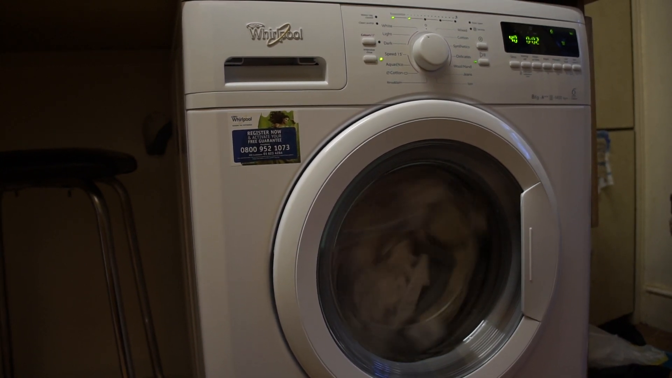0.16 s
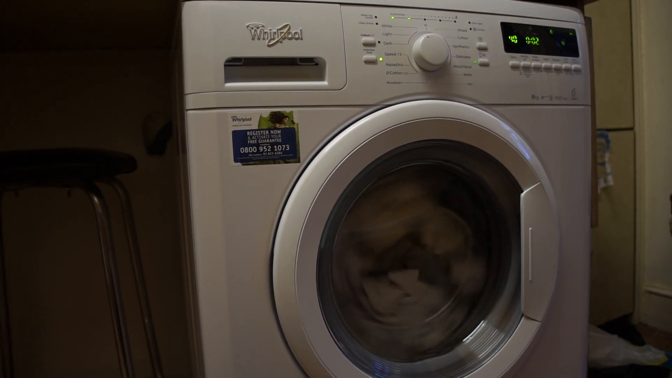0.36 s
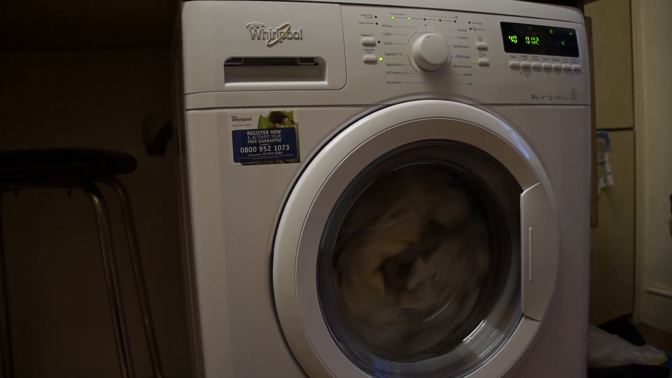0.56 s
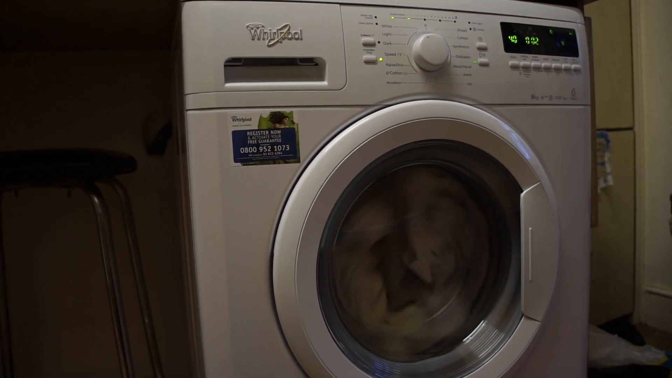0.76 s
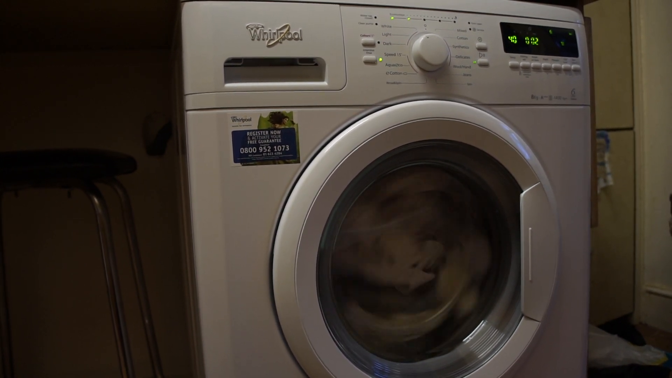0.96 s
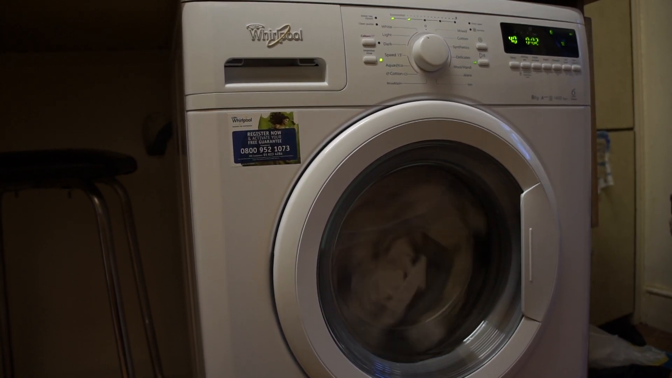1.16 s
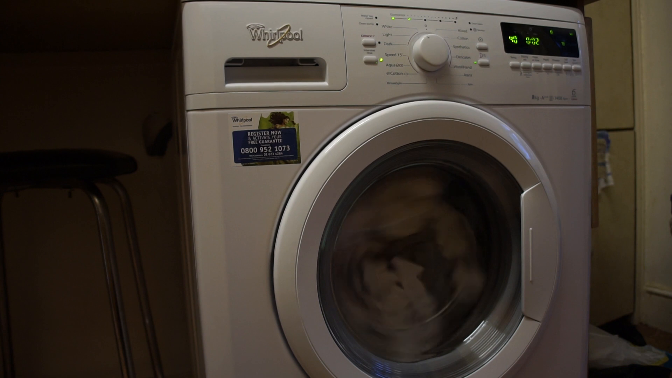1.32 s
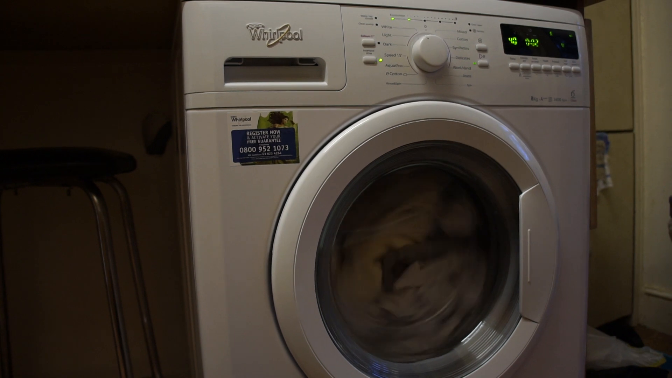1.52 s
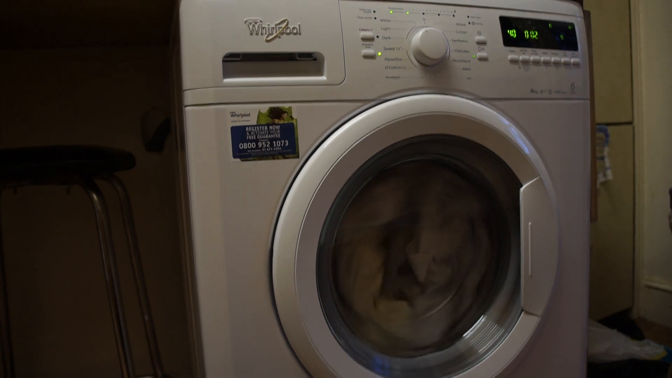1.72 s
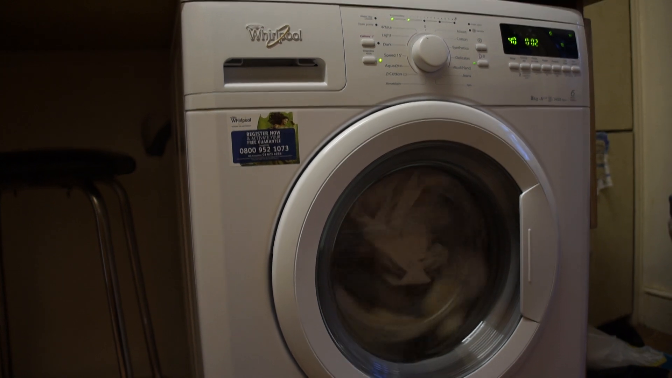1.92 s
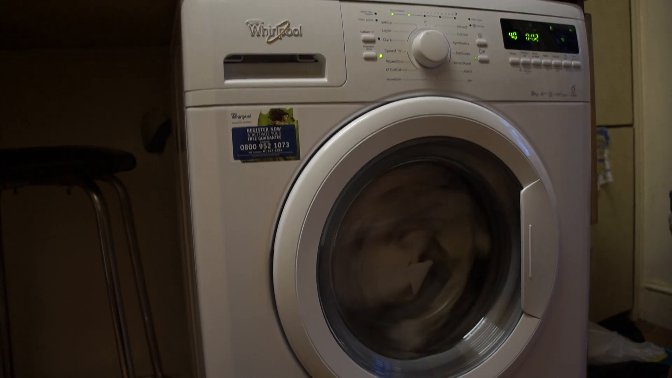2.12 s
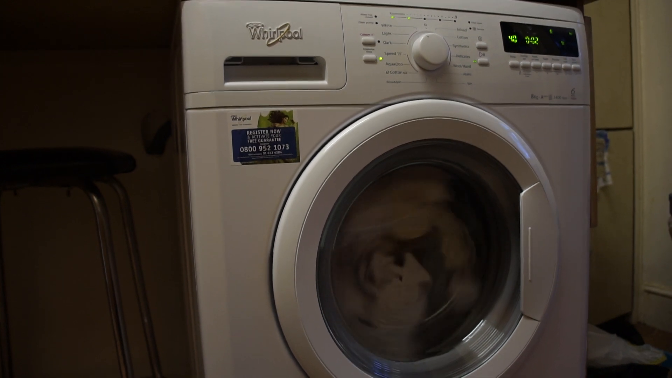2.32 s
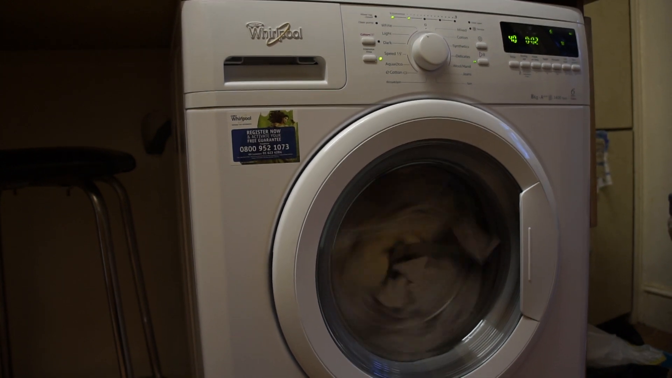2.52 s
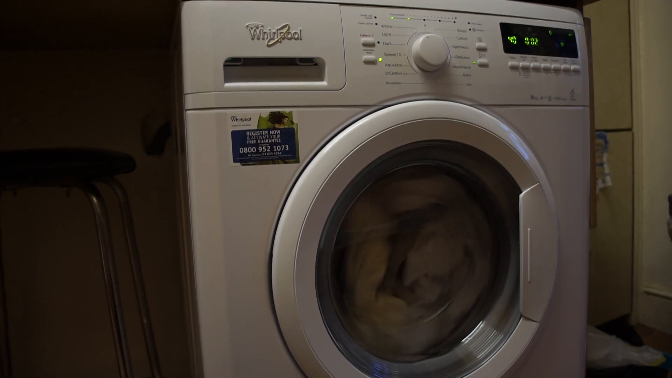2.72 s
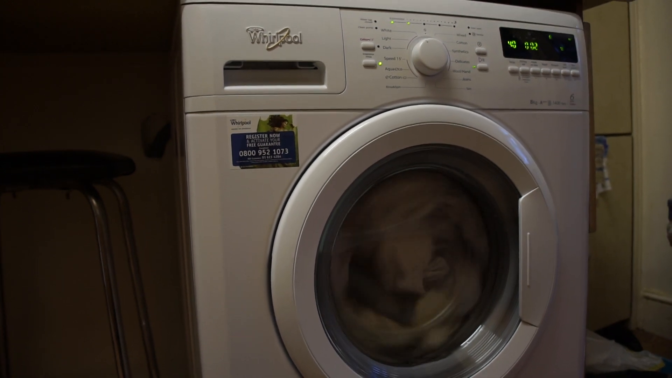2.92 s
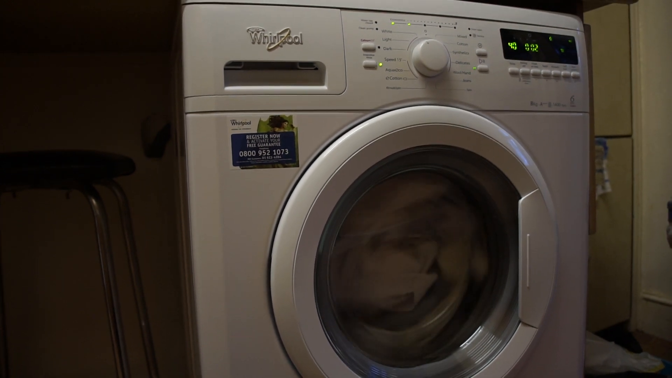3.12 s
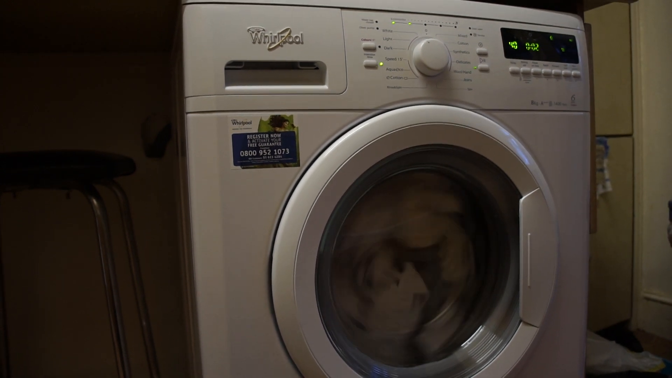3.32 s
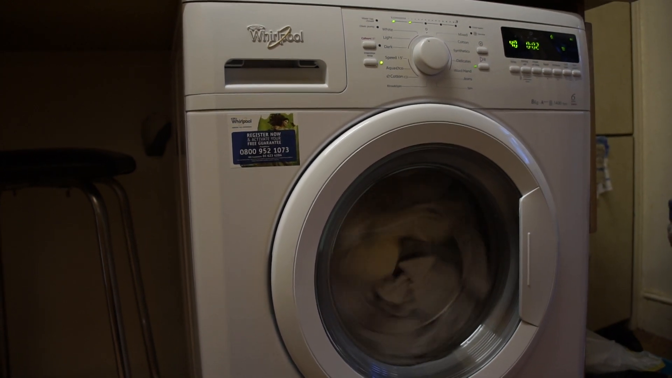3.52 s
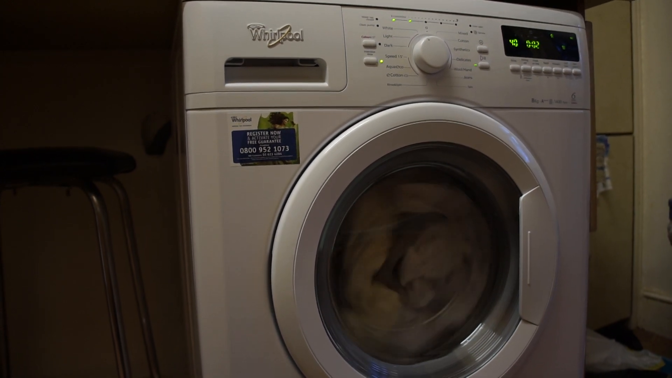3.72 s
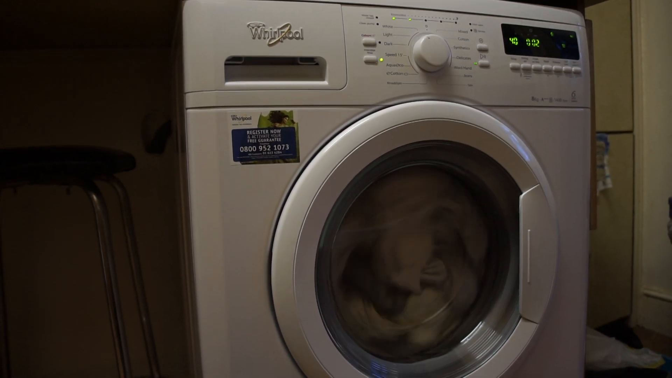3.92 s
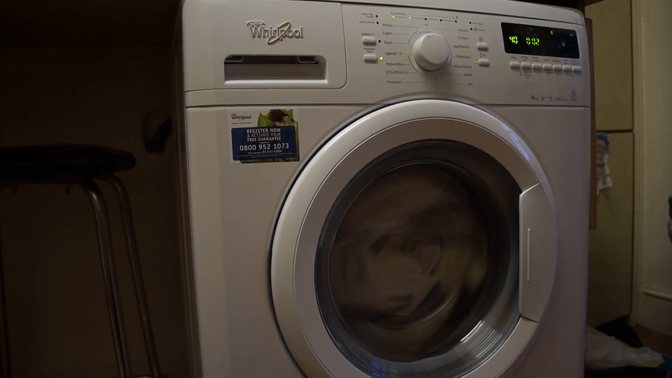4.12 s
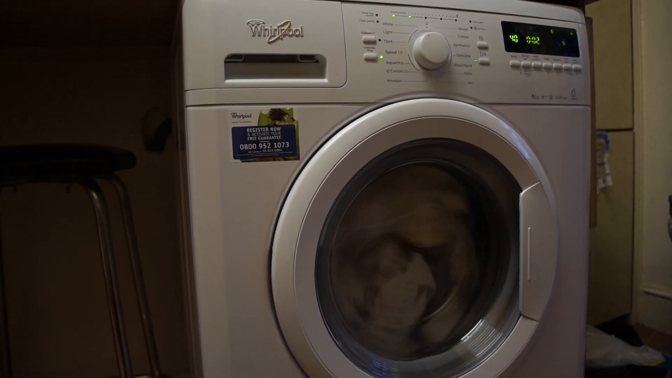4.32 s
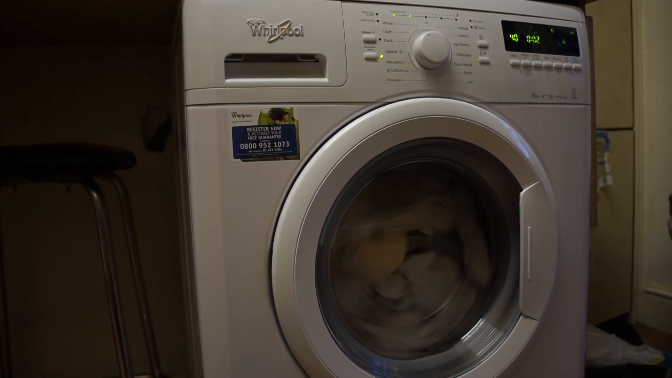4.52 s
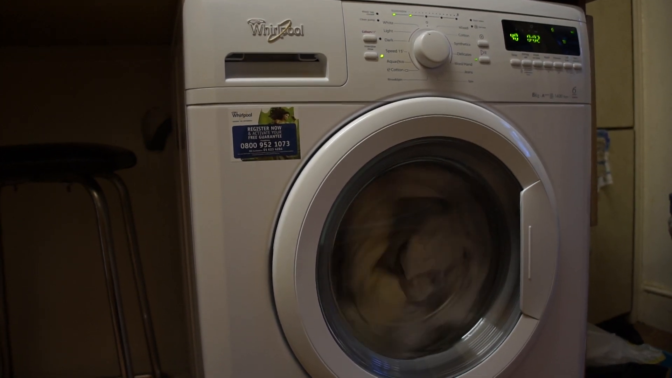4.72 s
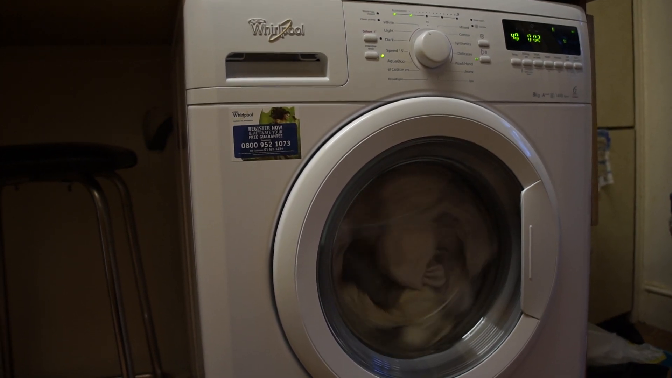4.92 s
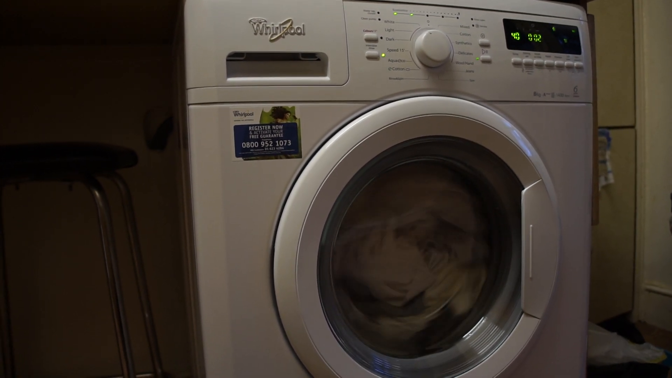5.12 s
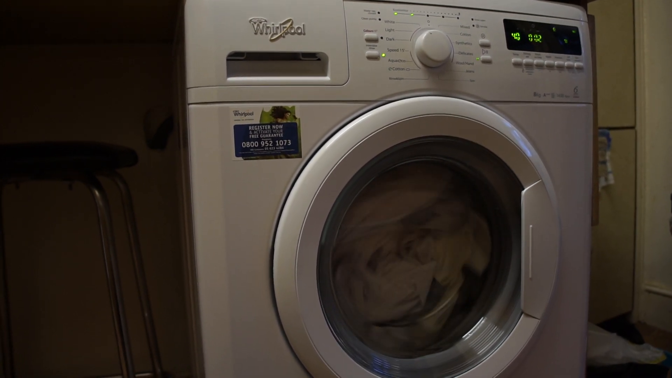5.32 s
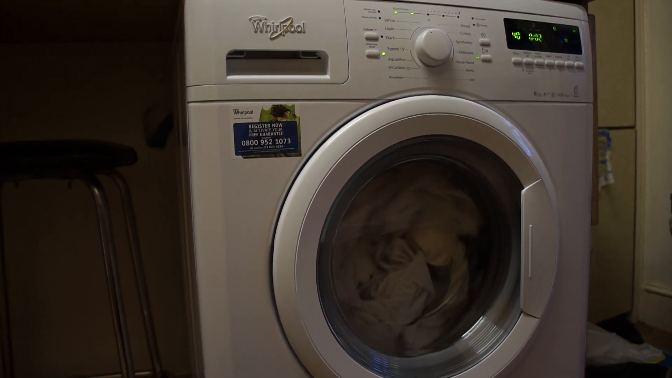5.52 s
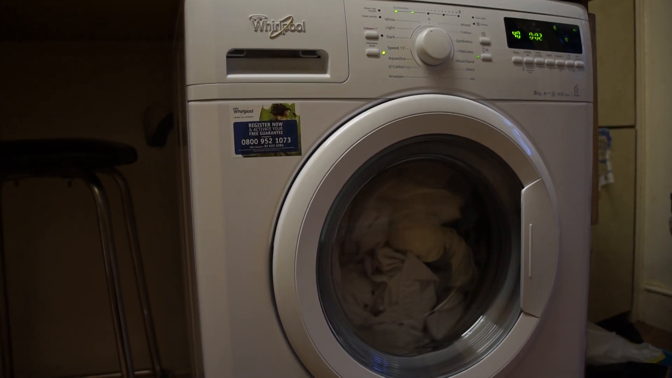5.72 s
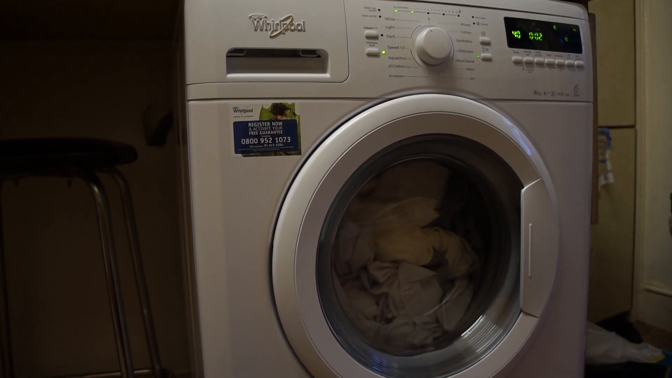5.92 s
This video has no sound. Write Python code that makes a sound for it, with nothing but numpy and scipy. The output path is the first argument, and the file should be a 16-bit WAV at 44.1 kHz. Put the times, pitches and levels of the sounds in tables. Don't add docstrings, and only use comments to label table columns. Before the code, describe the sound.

A strong mid-pitched motor whine wobbles as the load drags it, sagging briefly each turn while thin, rough high panel tones swell and fade. Soft ragged wet slaps and low thuds fall around the drum, with tiny hard ticks and steady hiss. The motor suddenly stops; faint whine, loose drum rumble and thinning hiss remain, then a latch clacks. Close stereo pickup, short indoor reverberation.

```python
import sys
import numpy as np
from scipy import signal
from scipy.fft import rfft, irfft, next_fast_len
from scipy.io import wavfile
from scipy.ndimage import uniform_filter1d, map_coordinates

SR = 44100
rng = np.random.default_rng(int(sys.argv[2]) if len(sys.argv) > 2 else 0)


def materialize(psi):
    bounded = np.clip(np.atleast_2d(psi).T, -1, 1)
    quanta = np.round(bounded * 32767).astype(np.int16)
    wavfile.write(sys.argv[1], SR, quanta)


def rack_gain(trim_db):
    fader = np.asarray(trim_db, float)
    return 10 ** (fader / 20)


N = 266937
T = np.arange(N) / SR
MAINS_HZ = 49.98
CUT_S = 4.69


def unit(x):
    return x / np.sqrt(np.mean(x ** 2) + 1e-20)


def along(points, hz):
    f, v = np.transpose(points)
    return np.interp(np.log(hz + 1), np.log(f + 1), v)


def curves(rows):
    s, *columns = np.transpose(rows)
    return [np.interp(T, s, column) for column in columns]


def wobble(rate):
    knots = rng.standard_normal(int(N * rate / SR) + 4)
    return map_coordinates(knots, [T * rate])


def bumps(rows, rest_db):
    swell_power = sum(rack_gain(2 * db) * np.exp(-((T - s) / half) ** 2) for s, half, db in rows)
    return 10 * np.log10(rack_gain(2 * rest_db) + swell_power)


def filtered(x, response):
    m = next_fast_len(N + SR // 2)
    return irfft(rfft(x, m) * response(np.fft.rfftfreq(m, 1 / SR)), m)[..., :N]


# (frequency [Hz], likeness [-1 to 1])
ALIKE = [(25, .99), (60, .96), (125, .97), (300, .9), (600, .95), (1200, .6), (2200, .5), (3500, .1)]


def rush(gain, alike=ALIKE):
    def mid_side(hz):
        turn = np.arccos(np.clip(along(alike, hz), -1, 1)) / 2
        return gain(hz) * np.array([np.cos(turn), np.sin(turn)])
    mid, side = filtered(rng.standard_normal((2, N)), mid_side)
    return unit(np.array([mid + side, mid - side]))


def tone(phase, db, lead, pan_db):
    side = np.array([[.5], [-.5]])
    return np.sqrt(2) * rack_gain(db + pan_db * side) * np.sin(phase + lead * side)


def onset(s, rise):
    return 1 - np.exp(-(np.clip(T - s, 0, None) / rise) ** 2)


def driven(t60):
    return rack_gain(-60 * np.clip(T - CUT_S, 0, None) / t60)


# (time [s], whine pitch [Hz], whine level [dB])
WHINE_PATH = [(0, 631, -30.5), (.25, 634, -33.5), (.52, 626.4, -38.5), (.85, 624.2, -31.5),
              (1.2, 638, -31.5), (1.4, 633.5, -32.5), (1.58, 625.4, -37), (1.74, 622, -32.5),
              (2.02, 623.5, -33), (2.32, 625.7, -40), (2.58, 622.2, -33.5), (3.28, 621.3, -31.5),
              (3.5, 629, -38), (3.68, 626, -39.5), (3.8, 624.4, -34), (4.1, 625.5, -34), (4.24, 627.8, -38),
              (4.48, 628.8, -34.5)]
# (time [s], depth [Hz])
LIFTS = [
    (.86, 3.95),
    (1.86, 6.5),
    (2.89, 13),
    (3.93, 11),
]
COAST_HZ, COAST_FROM_DB = 623.5, -34.5


def speed():
    inertia_s, lift_half_s, stall_hz, stall_db_per_hz = 0.063, .1, 620, 1.5
    whine_hz, whine_db = curves(WHINE_PATH + [(CUT_S - .07, COAST_HZ, COAST_FROM_DB)])
    whine_hz = uniform_filter1d(whine_hz, round(inertia_s * SR), mode="nearest")
    for s, depth_hz in LIFTS:
        whine_hz = whine_hz - depth_hz * np.exp(-((T - s) / lift_half_s) ** 2)
    return whine_hz, whine_db - stall_db_per_hz * np.clip(stall_hz - whine_hz, 0, None)


# (multiple of the mains [x], rms level [dB])
HUM_LINES = [(2, -65.5), (3, -71), (4, -47.5), (5, -61.5), (6, -52.5), (7, -53), (8, -49), (9, -63),
             (10, -60), (11, -53.5), (12, -59), (14, -86), (15, -60), (17, -66.5), (18, -88), (21, -80),
             (23, -69), (27, -67.5), (30, -83), (34, -70), (36, -76), (46, -76)]
# (offset from the whine [mains multiples], rms level [dB], gain towards a resonance [dB/Hz])
SIDEBANDS = [(-10, -78, 0), (-8, -74.5, 1.5), (-6, -55.5, 0.88), (-5, -56, -0.3), (-4, -51.5, -0.02),
             (-3, -81, -1.5), (-2, -55, 0.32), (-1, -53, 0.5), (1, -55, -0.2), (2, -67.5, 1), (3, -63.5, 0),
             (4, -62.5, 0), (6, -72, 0.5), (8, -76, 0.5), (17, -63, 0.5), (21, -68, 0.5), (25, -55, 0),
             (29, -59.5, 0.5), (31, -64, -0.5)]
# (time [s], level [dB])
SURGES = [(0, -37.5), (.28, -33.5), (.6, -31.5), (.8, -34), (1.1, -36), (1.3, -37), (1.572, -34.5),
          (1.9, -39), (2.5, -38.5), (2.72, -38), (3.099, -36.5), (3.3, -39.5), (3.5, -36.5), (3.76, -35),
          (4.2, -36.5), (4.38, -37.5)]


def hum():
    surge_half_s, surge_rest_db, coast_drop_db, dying_t60 = 0.072, -45, -22, 0.26
    whine_hz, whine_db = speed()
    surge_db = bumps([(s, surge_half_s, db) for s, db in SURGES], surge_rest_db)
    mains = 2 * np.pi * MAINS_HZ * T
    whine = 2 * np.pi * np.cumsum(whine_hz) / SR + .1 * wobble(30)
    stray_hz = whine_hz - whine_hz.mean()

    lines = np.zeros((2, N))
    for k, db in HUM_LINES:
        phase = k * mains + rng.uniform(0, 2 * np.pi)
        lines += tone(phase, db + 1.04 * wobble(6.28), -.25 + 0.47 * wobble(0.65), 0.36)
    for k, db, slope in SIDEBANDS:
        phase = whine + k * mains + rng.uniform(0, 2 * np.pi)
        level_db = db + slope * stray_hz + 2.0 * wobble(3.98)
        lines += tone(phase, level_db, -.25 + 0.71 * wobble(0.78), 1.0)

    main = tone(whine, whine_db + 0.46 * wobble(9) + 1.74 * wobble(24.86), -0.47, -1.2)
    main += tone(13 * mains + .35 * wobble(12), surge_db + .9 * wobble(25), -.32, -1.7)
    fall = driven(dying_t60) + rack_gain(coast_drop_db) * (1 - driven(dying_t60))
    return driven(0.12) * lines + main * fall * driven(11)


# (centre [s], half length [s], pitch [Hz], level [dB])
SWELLS = [
    (0.296, .08, 848, -67),
    (0.553, 0.1, 822, -58),
    (1.778, 0.1, 823, -60),
    (2.904, 0.1, 820, -50.5),
    (2.934, 0.067, 708, -44),
    (3.933, 0.048, 826, -50.5),
    (3.95, .08, 707, -58),
]


def swells():
    return sum(tone(2 * np.pi * hz * T, db - 4 * ((T - s) / half) ** 4, -0.45, .5)
               for s, half, hz, db in SWELLS)


# (centre [s], half length [s], pitch [Hz], level [dB])
SINGS = [(.04, 0.13, 2015, -42), (0.443, 0.065, 2005, -39.5), (0.693, 0.027, 2002, -47.5),
         (0.999, 0.09, 2027, -44.5), (1.44, 0.08, 2012, -43), (1.8, 0.059, 2015, -46),
         (2.024, 0.083, 2018, -46), (2.4, 0.18, 2022, -45.5), (2.593, .05, 2008, -43.5),
         (3.06, .08, 2007, -45), (3.413, 0.13, 2014, -43), (3.688, 0.064, 2004, -40),
         (4.05, .08, 2008, -43), (4.2, 0.075, 2013, -39), (4.399, 0.11, 2013, -42.5),
         (4.621, .07, 2017, -44)]
# (offset [ripples], low panel [dB], high panel [dB])
RIPPLE = [(-5, -22, -20.5), (-2, -39, -16), (-2, -17, -20), (-1, -11.5, -24), (-1.5, -32, -24),
          (1.5, -34, -16), (2.5, -18, -36), (6.5, -29, -38), (10, -27, -18.5)]


def panels():
    low_centre_hz, tuning_hz, tuning_wide_hz, pull_hz = 1900.5, 625.8, 2.4, 4
    low_peak_db, low_rest_db, high_rest_db = -39.5, -60, -51.5
    off = (speed()[0] - tuning_hz) / tuning_wide_hz
    low_hz = low_centre_hz + pull_hz * off / (1 + off ** 2 / 4)
    low_db = low_rest_db + (low_peak_db - low_rest_db) / (1 + off ** 2) + 1.2 * wobble(8.09)
    high_hz, = curves([(s, hz) for s, _, hz, _ in SINGS])
    high_db = bumps([(s, half, db) for s, half, _, db in SINGS], high_rest_db) - 2.0

    low = 2 * np.pi * np.cumsum(low_hz) / SR + 0.15 * wobble(25.04)
    high = 2 * np.pi * np.cumsum(high_hz) / SR + 0.37 * wobble(35)
    out = tone(low, low_db + 1.2 * wobble(27.6), 0.52, 0.81)
    out += tone(high, high_db + 3 * wobble(40), 0.4, -0.37)

    ripple = 4 * np.pi * MAINS_HZ * T
    for k, by_low_db, by_high_db in RIPPLE:
        low_side_db = 0.66 * low_db - 22 + by_low_db + 4.2 * wobble(4.65)
        high_side_db = 0.57 * high_db - 19.5 + by_high_db + 2.1 * wobble(7)
        out += tone(low + k * ripple, low_side_db, 1.0, .5) * driven(.3)
        out += tone(high + k * ripple, high_side_db, 0.94, .5) * driven(.3)
    return out * driven(0.3)


# (frequency [Hz], width [Hz], level [dB])
CABINET_MODES = [(321, 37, -23), (539, 39, -22.5), (637.6, 28.7, -7), (701, 43, -16), (833, 20, -34.5),
                 (1492, 14.5, -22.5), (1690, 165, -28.5), (1880, 43, -21), (1962, 95, -13), (2015, 44, -10),
                 (2200, 140, -30), (3070, 370, -34)]
# (frequency [Hz], level [dB])
RUMBLE = [(30, -120), (60, -42.5), (200, -32.5), (450, -29.5), (900, -36.5), (2500, -34.5), (4000, -49.5),
          (9000, -120)]


def cabinet():
    def modes(f):
        return sum((-1) ** k * rack_gain(db) * 1j * f * width / (centre ** 2 - f * f + 1j * f * width)
                   for k, (centre, width, db) in enumerate(CABINET_MODES))
    kicks = 1 + 0.13 * np.cos(4 * np.pi * MAINS_HZ * T)
    coast = filtered(rush(modes), lambda f: 1 / (1 + (f / 1100) ** 4))
    ringing = rush(modes) * driven(0.62) + rack_gain(-15) * coast * driven(7.2)
    ringing = ringing * rack_gain(-40.5 + 2.1 * wobble(2.765))
    broad = rush(lambda f: rack_gain(along(RUMBLE, f))) * (driven(0.47) + rack_gain(-5) * driven(10.0))
    return ringing + kicks * rack_gain(-51.5 + 1.35 * wobble(8)) * broad


# (time [s], slap level [dB], thud level [dB], rise [s], t60 [s])
DROPS = [(0.219, -46, -68, 0.014, 0.29), (1.245, -42.5, -50, 0.021, 0.52), (1.42, -70, -64.5, 0.057, 0.86),
         (2.2, -50, -78, 0.028, 0.54), (2.31, -54, -74, 0.015, 0.26), (3.22, -49, -72, 0.026, 0.72),
         (4.19, -45, -67, 0.048, 0.52), (4.63, -52, -66, .015, .35), (4.83, -72, -62, 0.019, 0.29),
         (5.21, -51.5, -82, 0.016, 0.58), (5.28, -70, -70, 0.017, 0.32), (5.41, -76.5, -66, 0.012, .2),
         (5.821, -59, -71, .02, 0.41)]
# (frequency [Hz], level [dB])
SLAP = [(100, -120), (300, 3), (1000, 1.5), (1600, 3.5), (2100, 2.5), (3000, 1), (5500, -4), (8000, -12),
        (15500, -16.5)]
# (frequency [Hz], level [dB])
THUD = [(20, -120), (40, -26), (70, -1), (88, -0.5), (110, -13), (135, -2), (170, -15), (250, -8),
        (450, -10.5), (900, -120)]


def laundry():
    slap, thud = np.zeros(N), np.zeros(N)
    for s, slap_db, thud_db, rise, t60 in DROPS:
        t = np.clip(T - s, 0, None)
        strike = onset(s, rise)
        decay = rack_gain(-60 * t / t60)
        scatter = 0.27 * rack_gain(-60 * t / 0.91)
        slap += rack_gain(slap_db + 5) * strike * (decay + scatter)
        thud += rack_gain(thud_db + 15.5) * strike * decay
    splashy = rack_gain(1.5 * wobble(60))
    wet_slap = slap * splashy * rush(lambda f: rack_gain(along(SLAP, f)))
    return wet_slap + thud * rush(lambda f: rack_gain(along(THUD, f)))


# (frequency [Hz], level [dB per Hz])
LOCK = [(18, -29), (30, -2), (184, -10), (738, -16.5), (1280, -23), (1620, -7.5), (3130, -28.5),
        (4280, -23), (6870, -34), (9170, -29), (15900, -34)]


def lock():
    push_s, push_rise_s, push_db = 5.978, 0.011, -45
    bolt_s, bolt_rise_s, bolt_db, bolt_t60 = 6.003, 0.0023, -40.5, 2.3
    rattle_db = bolt_db - 60 * np.clip(T - bolt_s, 0, None) / bolt_t60 + 1.8 * wobble(120)
    rattle = rack_gain(rattle_db) * rush(lambda f: rack_gain(along(LOCK, f)) * (f > 250))
    push = rack_gain(push_db) * rush(lambda f: rack_gain(along(LOCK, f)) * (f < 250))
    return onset(bolt_s, bolt_rise_s) * rattle + onset(push_s, push_rise_s) * push


# (time [s], peak level [dB], pitch [Hz], t60 [s], noisy edge [ratio])
TICKS = [(2.066, -30, 2600, 0.013, 1.1), (2.1, -30, 2420, 0.0097, 1.38), (2.204, -38, 1068, 0.17, 0.4),
         (2.31, -41, 1050, 0.064, 0.25), (2.537, -39, 2600, 0.0087, 1.2), (3.112, -37, 2784, .01, 1.2),
         (3.557, -37, 2802, .01, 1.16), (4.119, -29, 2707, .01, 1.2), (4.655, -42, 1547, 0.11, 0.8),
         (5.08, -42, 1042, 0.082, 0.2), (6.008, -31, 1710, 0.016, 0.5)]


def ticks():
    out, t = np.zeros(N + SR), np.arange(SR // 4) / SR
    for s, db, hz, t60, edge in TICKS:
        ping = np.sin(2 * np.pi * hz * t) * (1 - np.exp(-t / 0.00038))
        rough = edge * rng.standard_normal(len(t))
        out[round(s * SR):][:len(t)] += rack_gain(db - 60 * t / t60) * (ping + rough)
    return filtered(out[:N], lambda f: 1j * f / (900 + 1j * f) / (1 + 1j * f / 3500) ** 2)


# (frequency [Hz], t60 [s])
ROOM = [(100, .5), (600, 0.29), (2000, 0.38), (8000, 0.18)]


def room(x):
    hz, t, z = signal.stft(rng.standard_normal((2, SR // 2)), SR, nperseg=256)
    decay = rack_gain(-60 * t / along(ROOM, hz)[:, None])
    tail = signal.istft(z * decay, SR, nperseg=256)[1]
    return signal.fftconvolve(x, tail / np.linalg.norm(tail[0]), axes=1)[:, :N]


# (frequency [Hz], level [dB per Hz])
SPRAY = [(1900, -8.5), (3200, -3), (3600, -9.5), (4750, -3), (5600, -7), (7270, -10), (8900, -7),
         (9650, -6.5), (10400, -8), (12300, -5.5), (13250, -2.5), (14000, -6), (15100, -8), (15900, -15)]
# (frequency [Hz], level [dB per Hz])
DRUM = [(12, -36), (20, -14), (53, -4), (99, -15), (145, -7), (180, -0.5), (290, -2), (526, -11),
        (637, -6.5), (868, -15.5), (2260, -21.5), (3550, -15), (6000, -32), (7800, -51), (13200, -120)]


def air():
    spray_db, thins_db_per_s, dulls_from_s, dulls_db_per_s = -52, 3, 4.98, 5
    drum_db, sinks_db_per_s, loose_db, loose_s = -58.5, 0.66, 6, 0.29
    brush_hz, brush_wide_hz, brush_db = 9670, 350, -63.5
    pan_db = np.array([[1.3], [-1.3]])
    coasting = np.clip(T - CUT_S, 0, None)

    spray = rush(lambda f: rack_gain(along(SPRAY, f)) / (1 + (1700 / (f + 1)) ** 6), [(4000, -0.2), (12000, -0.1)])
    top = filtered(spray, lambda f: 1 / (1 + (8500 / (f + 1)) ** 8))
    bright_db = -dulls_db_per_s * np.clip(T - dulls_from_s, 0, None)
    spray = spray + (rack_gain(bright_db) - 1) * top
    thinning_db = spray_db - thins_db_per_s * coasting + 4
    spray = spray * rack_gain(thinning_db + 0.32 * wobble(9) + 0.72 * wobble(4.0) + pan_db)

    loosening_db = loose_db * coasting / loose_s * np.exp(1 - coasting / loose_s)
    rumble_db = drum_db - sinks_db_per_s * T + loosening_db + 6.5
    drum = rack_gain(rumble_db + 1.8 * wobble(4.5)) * rush(lambda f: rack_gain(along(DRUM, f)))

    brushes = rush(lambda f: np.exp(-((f - brush_hz) / brush_wide_hz) ** 2), [(9000, 0)])
    return spray + drum + rack_gain(brush_db + 1.2 * wobble(12) + pan_db) * driven(.4) * brushes


def scene():
    small = ticks()[None]
    sing = panels()
    motor = hum() + swells() + sing + rack_gain(-9.0) * room(sing) + cabinet()
    return motor + laundry() + lock() + small + rack_gain(-6) * room(small) + air()


def band_limit(x):
    return signal.sosfilt(signal.butter(12, 16060, fs=SR, output="sos"), x)


def record(dry):
    top_hz = 15760
    mix = filtered(dry, lambda hz: hz < top_hz)
    return band_limit(mix)


dry = scene()
out = record(dry)
materialize(out)
```